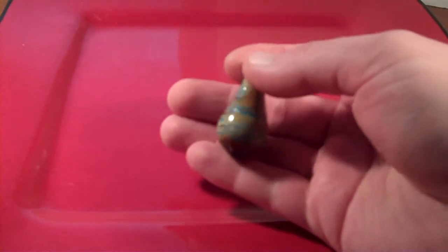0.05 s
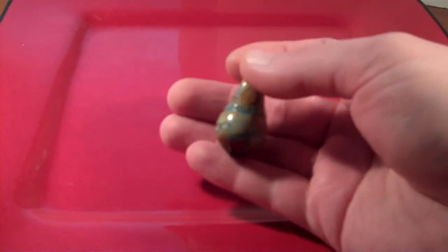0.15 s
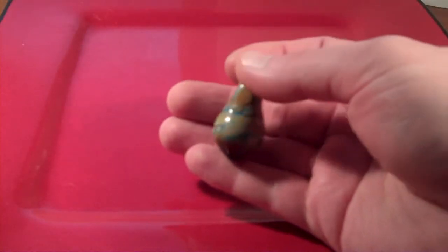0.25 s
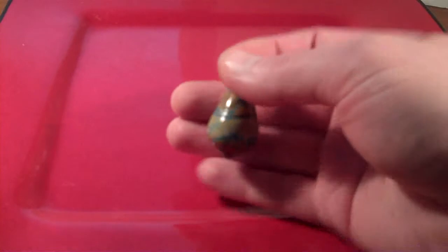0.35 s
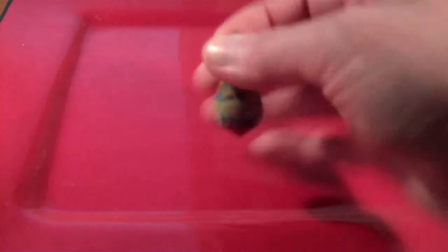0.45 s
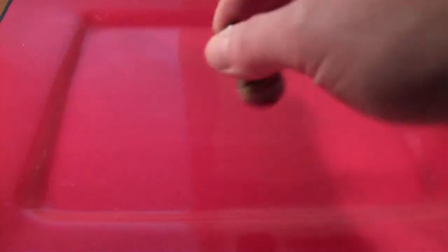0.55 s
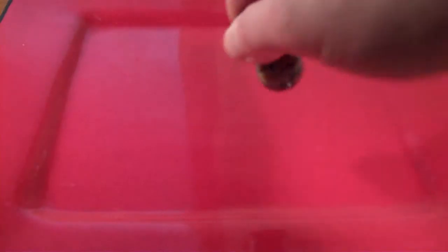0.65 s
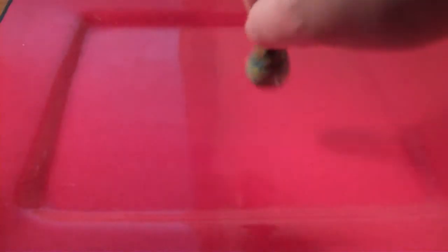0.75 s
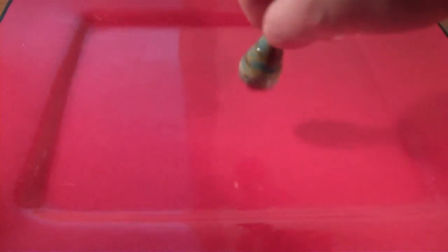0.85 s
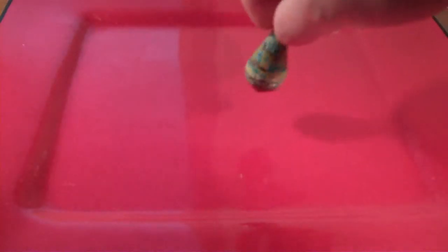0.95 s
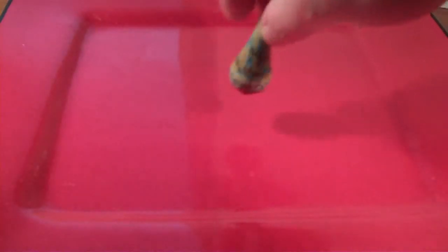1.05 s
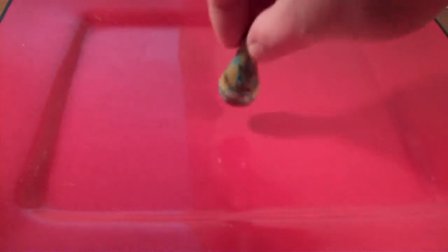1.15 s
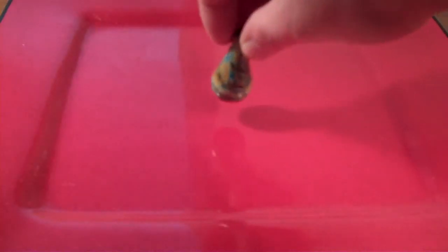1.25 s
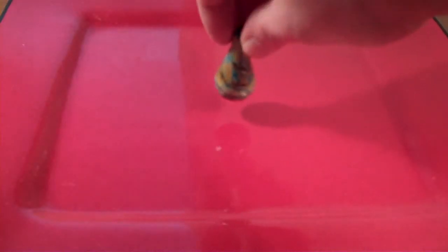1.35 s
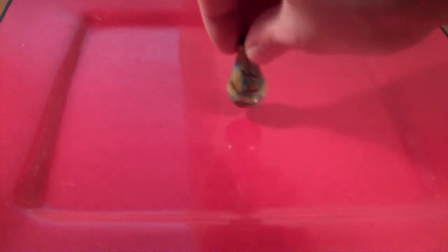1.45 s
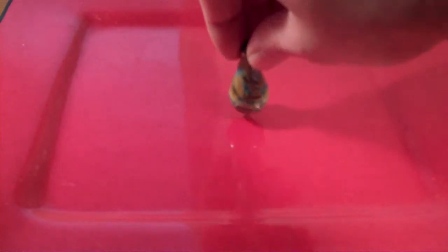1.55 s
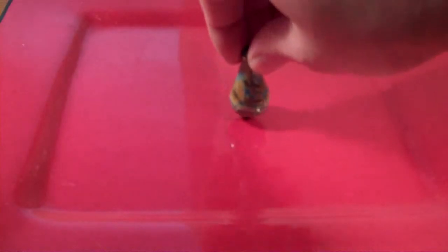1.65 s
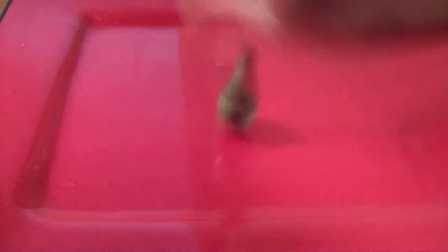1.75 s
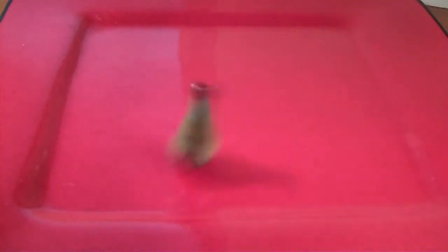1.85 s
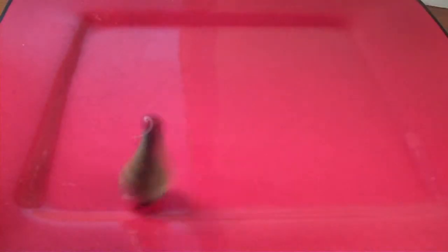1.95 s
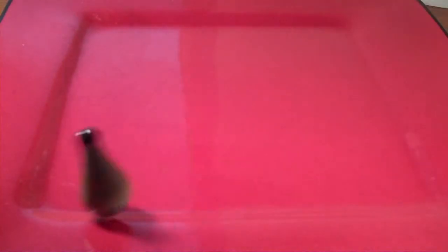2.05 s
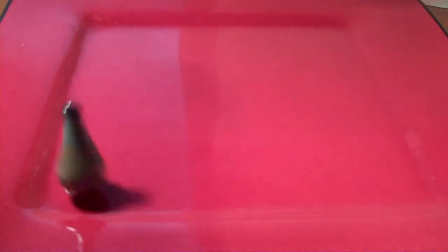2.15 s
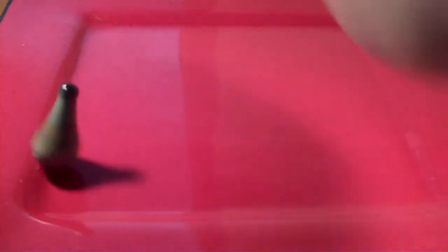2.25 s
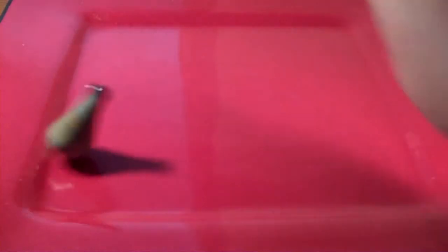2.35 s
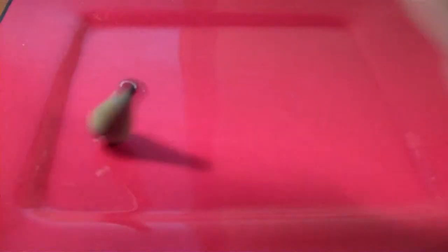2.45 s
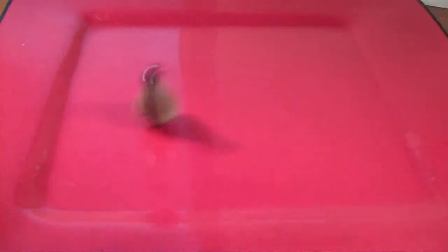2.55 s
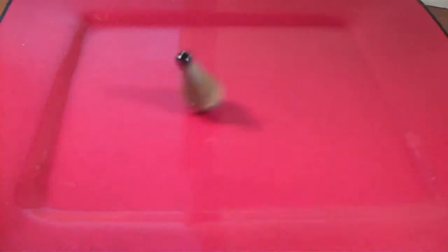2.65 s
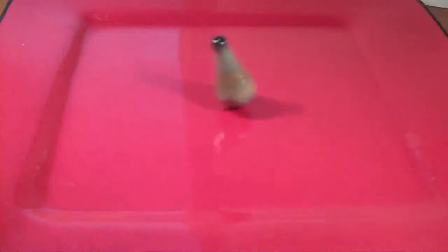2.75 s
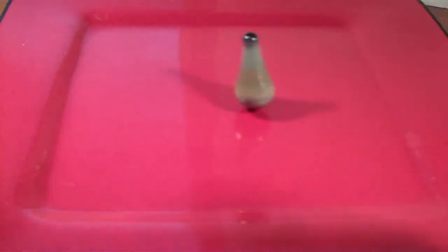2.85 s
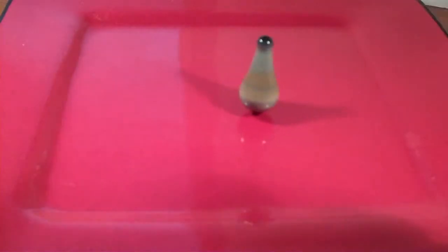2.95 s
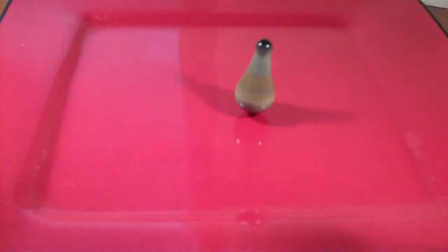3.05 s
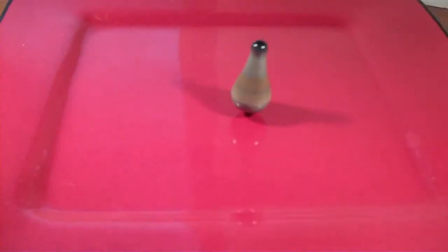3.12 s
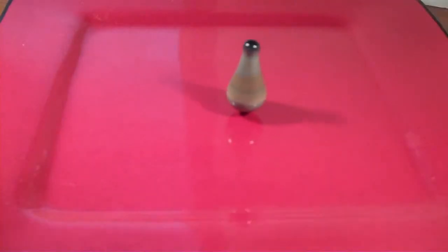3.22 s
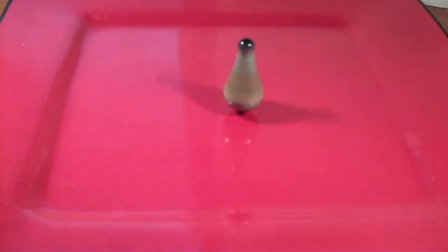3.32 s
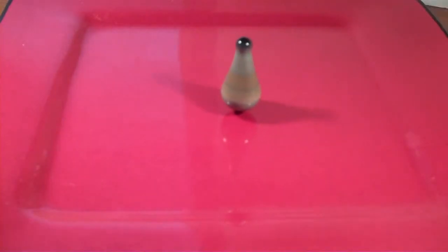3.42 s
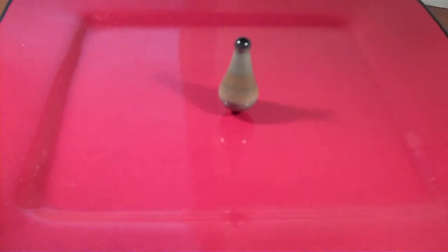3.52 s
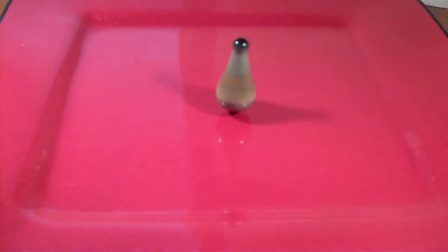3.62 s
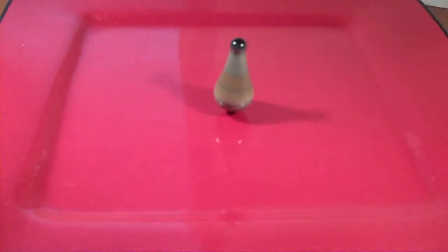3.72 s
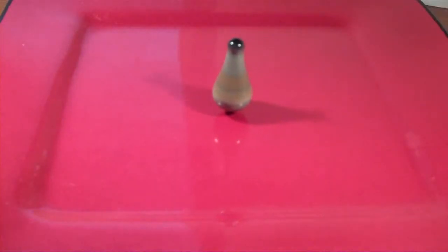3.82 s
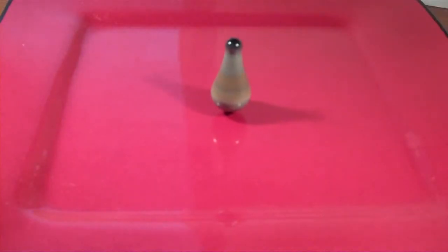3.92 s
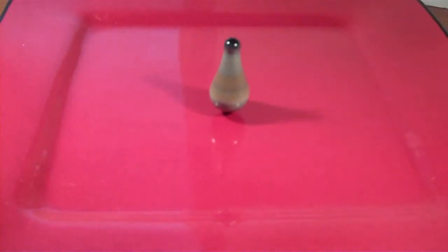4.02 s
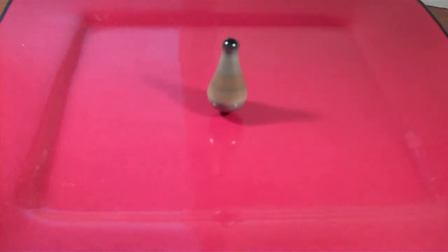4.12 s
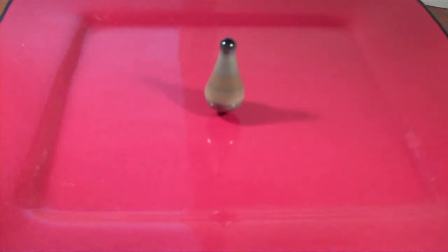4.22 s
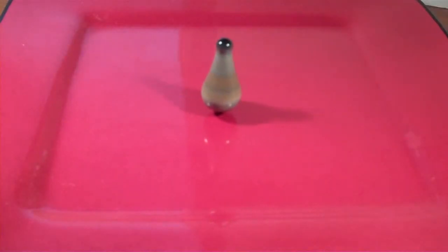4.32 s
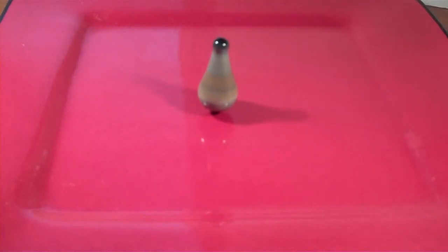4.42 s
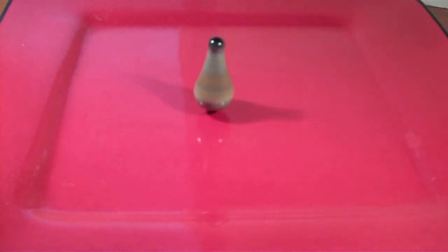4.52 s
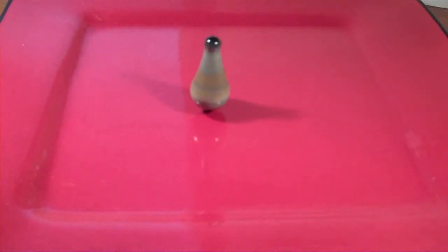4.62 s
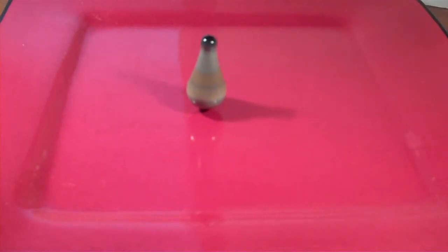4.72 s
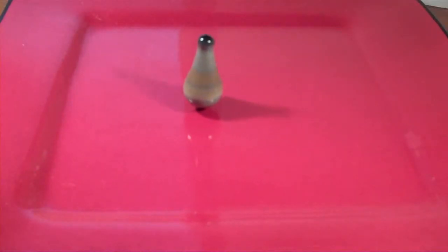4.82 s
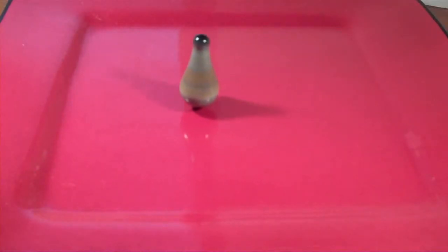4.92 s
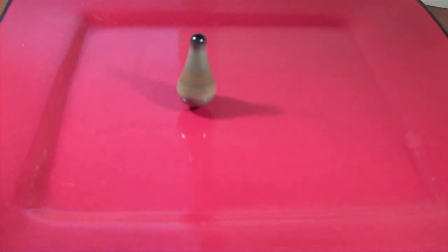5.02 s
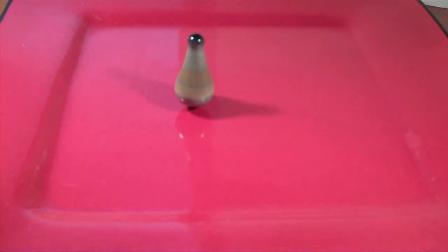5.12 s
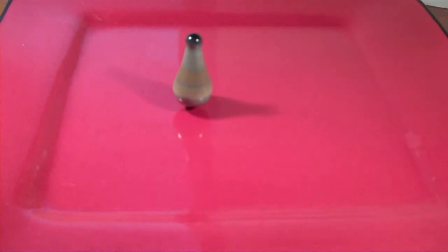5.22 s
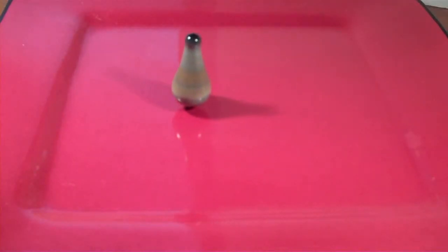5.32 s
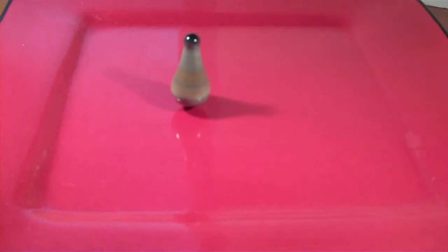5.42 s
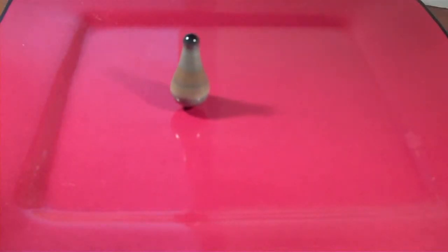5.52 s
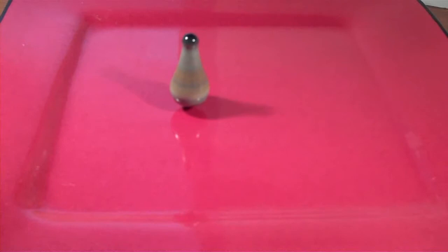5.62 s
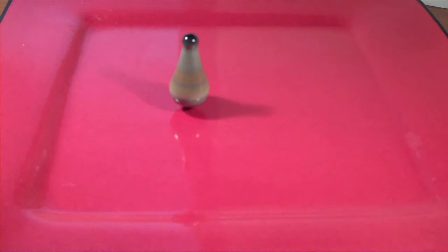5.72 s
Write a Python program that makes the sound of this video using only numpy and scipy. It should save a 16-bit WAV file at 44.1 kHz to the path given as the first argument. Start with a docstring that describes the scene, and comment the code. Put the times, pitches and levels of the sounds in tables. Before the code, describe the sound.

A small glass top drops spinning onto a ceramic plate, clinks loudly, rattles around the rim, then settles into a faint grainy whir.

```python
"""In a quiet room, a glass top is dropped spinning onto a ceramic plate, heard up close in stereo.
It bounces with cracks and ringing modes, then rattles along the rim with every wobble, a touch a turn.
It stands up and whirs on its tip: grainy noise pushes the plate's resonances, with rasps where it catches.
The clinks overload the input, whose gain ducks and creeps back while the top spins on.
Short dull reflections and a steady low room rush lie behind it."""
import sys
import numpy as np
from scipy import signal
from scipy.fft import rfft, irfft, next_fast_len
from scipy.io import wavfile
from scipy.ndimage import uniform_filter1d, minimum_filter1d, map_coordinates

SR = 44100
rng = np.random.default_rng(int(sys.argv[2]) if len(sys.argv) > 2 else 0)


def to_wav(s):
    """Save 16-bit WAV."""
    ch = np.atleast_2d(s).T  # columns
    pcm = np.round(np.clip(ch, -1, 1) * 32767)  # PCM
    wavfile.write(sys.argv[1], SR, pcm.astype(np.int16))


N = 254456

# Ringing modes of the plate: (nominal frequency [Hz], relative level [dB], left minus right [dB])
PLATE_MODES = [(332, -34, 0), (890, -26, -1), (1580, -7, 2), (1930, -23, -2), (2356, -2, 1),
               (2625, -11, -2), (2890, -13, 2), (3430, -6, -6), (3540, -5, 3), (3780, -8, 1), (4120, -5, 3),
               (4248, -9, -3), (4685, -7, -2), (4805, 0, -6), (5115, -4, -2), (5155, -5, -2),
               (5447, -9, -1), (5960, -2, -14), (6288, -8, -3), (6680, -10, -7), (6830, -12, 3),
               (7450, -9, 13), (7555, -2, 19), (7915, -7, 15), (8110, -11, 13), (8490, -19, 16)]
# Broad grit of the tip on the glaze: (frequency [Hz], relative density [dB per Hz])
GRIT_SPECTRUM = [(500, -22), (1200, -0.5), (2600, 8.5), (3500, -1.5), (4100, -5), (5200, -11.5),
                 (6000, -15.5), (8000, -9), (10000, -50.5)]
TURNS_PER_S = 63  # the spin


def amp(db):
    """Decibels to gain."""
    return 10 ** (np.asarray(db) / 20)


def unit(x):
    """Scaled to rms 1."""
    return x / np.sqrt(np.mean(x ** 2) + 1e-20)


def along(points, hz):
    """(frequency [Hz], value) points read on a log frequency axis."""
    f, v = np.transpose(points)
    return np.interp(np.log(hz + 1), np.log(f + 1), v)


def curves(rows):
    """One value per sample for each column after the time."""
    s, *cols = np.transpose(rows)
    return [np.interp(np.arange(N) / SR, s, c) for c in cols]


def drift(rate):
    """A smooth random curve with rate knots a second."""
    knots = rng.standard_normal(int(N * rate / SR) + 4)
    return map_coordinates(knots, [np.arange(N) * rate / SR])


def filtered(x, response):
    """x times a complex response of frequency."""
    n = x.shape[-1]
    m = next_fast_len(n + SR // 8)
    return irfft(rfft(x, m) * response(np.fft.rfftfreq(m, 1 / SR)), m)[..., :n]


def pair(alike, size):
    """White stereo noise whose two sides share the given likeness (correlation)."""
    mid, side = rng.standard_normal((2, size))
    turn = np.arccos(np.clip(alike, -1, 1)) / 2
    return np.cos(turn) * mid + np.sin(turn) * np.array([side, -side])


def coloured(x, spectrum):
    """x under a spectrum, at rms 1."""
    return unit(filtered(x, lambda hz: amp(along(spectrum, hz))))


def add(track, s, sound):
    """Mix a sound into a track at s seconds."""
    part = track[..., round(s * SR):][..., :sound.shape[-1]]
    part += sound[..., :part.shape[-1]]


def clinks(clash_db=-7, clash_t60=0.077, crack_db=-1, crack_t60=0.0065):
    """Each blow cracks and rings the plate, with its own share of low, middle and high ring."""
    # Dense short ringing between the modes: (frequency [Hz], relative density [dB per Hz])
    clash_spectrum = [(200, -15.5), (600, -19), (1000, -5), (1700, 3), (3500, 8), (6800, -13.5), (8100, -8),
                      (13500, -12)]
    low_ring_db, rim_low_ring_db = -7, -12  # at the middle, and the change at the stiff rim
    out = np.zeros((2, N))
    t = np.arange(SR // 2) / SR
    early = slice(SR // 70)  # each share is levelled on its first 14 ms
    mode_hz = np.array(PLATE_MODES)[:, 0]
    lag = rng.normal(0, 1.0, (len(PLATE_MODES), 1, 1))  # each mode reaches the two ports out of step

    def register(hz):
        return np.digitize(hz, [1000, 2000, 5600])

    for s, level, treble, strongest_hz in contacts():
        low = low_ring_db + rim_low_ring_db * outward(s)
        modes = ring(t, strongest_hz, lag)
        clash = amp(clash_db) * coloured(pair(0.83, len(t)), clash_spectrum)
        # register 1 is the low ring, 0 and 2 stay at the blow's level, 3 is the treble
        for bands, db in ([1], low), ([0, 2], 0), ([3], treble):
            part = filtered(clash, lambda hz: np.isin(register(hz), bands))
            part = part * amp(-60 * t / clash_t60)
            part += modes[np.isin(register(mode_hz), bands)].sum(0)
            add(out, s, amp(level + db) * part / part[:, early].std())
        crack = coloured(pair(0.63, len(t)), clash_spectrum)
        add(out, s, amp(level + crack_db - 60 * t / crack_t60) * crack)
    return out


def ring(t, strongest_hz, lag, t60=0.089, slow_hz=600, favour_db=7, favour_hz=110, scatter_db=3.5,
         attack=0.00027):
    """Every mode after one blow, as (mode, channel, time); the spot that is hit favours one of them."""
    hz, db, pan_db = np.transpose(PLATE_MODES)[:, :, None, None]
    chance = rng.standard_normal((len(PLATE_MODES), 3, 1, 1))
    favour = favour_db * np.exp(-((hz - strongest_hz) / favour_hz) ** 2)
    db = db + scatter_db * chance[:, 0] + favour
    apart = np.array([[.5], [-.5]])  # left, right
    sides = amp(pan_db * apart) / np.hypot(amp(pan_db / 2), amp(-pan_db / 2))
    cycles = (hz + 8 * chance[:, 1]) * t + chance[:, 2]  # each blow detunes the modes by some 8 Hz
    phase = 2 * np.pi * cycles + lag * apart
    life = t60 * (1 + (slow_hz / hz) ** 2)  # the slow bending modes hum on longest
    return amp(db - 60 * t / life) * sides * np.sin(phase) * (1 - np.exp(-t / attack))


def contacts(count=4):
    """Two blows a bounce, one a turn in each rattle: (time [s], level [dB], treble [dB], ring [Hz])."""
    # The top lands on its tip, then its flank slaps down:
    # (time [s], level [dB], slap over that [dB], treble [dB], strongest ring [Hz])
    bounces = [(1.8516, 1.5, -10, -11, 3430), (1.9369, 11.5, -9.5, -2.5, 6290), (1.9936, 6, -4.5, -5, 4810),
               (2.042, -2, 2.5, -7.5, 5040), (2.0833, -6, 2.5, -9, 4990)]
    # Each wobble dips the spinning flank onto the plate for a short rattle:
    # (time [s], level [dB], turns until the deepest touch, treble [dB], strongest ring [Hz])
    rattles = [(2.1846, 0.5, 0.39, -3, 4810), (2.2457, -2, 0.057, -5, 4810), (2.3123, -3.5, 0.83, -3, 4970),
               (2.3707, -3.5, 0.21, 2.5, 7550), (2.4204, -3, 0.65, -7, 3540),
               (2.4766, -6.5, 0.19, -4.5, 5960), (2.5277, -2.5, 0.18, 1.5, 7560),
               (2.575, -0.5, 0.45, 2, 7550), (2.625, -2.5, 1.33, 1, 7900), (2.684, -4, 0.91, -0.5, 4120),
               (2.7481, -1, 0.76, -2, 3920), (2.81, -2, 0.36, -4, 4800), (2.856, -9.5, 0.76, -9, 5150),
               (2.907, -5, 0.8, -8.5, 5070)]
    # A graze strikes a new spot, which favours a ring in this range: (lowest [Hz], highest [Hz])
    graze_ring = (3670, 5400)
    slap_s = 0.011  # from tip to flank
    graze_db, graze_dull_db, graze_limit_db = 5, 3, 15  # weaker and duller off the deepest; most lost
    scatter_s = 0.0008  # how unevenly the touches come
    for s, db, slap_db, treble_db, hz in bounces:
        yield s, db, treble_db, hz
        yield s + slap_s, db + slap_db, treble_db, hz
    turns = np.arange(count)
    for s, db, deepest, treble_db, hz in rattles:
        off = np.abs(turns - deepest)
        loss = graze_db * (off ** 2 - off.min() ** 2)
        weaker = graze_limit_db * np.tanh(loss / graze_limit_db)
        duller = graze_dull_db * (off - off.min())
        uneven = scatter_s * np.sqrt(turns) * rng.standard_normal(count)
        times = s + turns / TURNS_PER_S + uneven
        rings = np.where(off == off.min(), hz, rng.uniform(*graze_ring, count))
        yield from zip(times, db - weaker, treble_db - duller, rings)


def outward(s):
    """How far out the top is at s seconds: 0 at the middle, 1 at the rim."""
    # The top's path: (time [s], share of the way from the middle of the plate to its rim)
    path = [(1.95, 0), (2.19, 0.94), (2.85, 0.89), (3.15, 0.015)]
    return np.interp(s, *np.transpose(path))


def whir(roll_db=-45, scratch_db=1.5, turn_db=3, uneven_db=2.24, grain_db=3.0, grit_db=-6):
    """The tip rubs the glaze, harder once a turn, and its grainy push sounds through the plate."""
    # The tip on smoother and rougher glaze: (time [s], relative scratching level [dB])
    glaze = [(4.03, -43.5), (4.12, -38), (4.538, -41), (4.954, -47), (5.074, -38.5), (5.09, -46),
             (5.694, -47), (5.77, -53)]
    # Rumble of the rolling tip: (frequency [Hz], relative density [dB per Hz])
    roll_spectrum = [(500, -32), (800, -9), (1100, 15.5), (1350, 11), (2000, -6.5), (2700, 5), (3600, -46),
                     (6000, -21)]
    rim_scratch_db, rim_roll_db = 16.5, 10.5  # the tip scrapes and rolls harder at the rim
    land_s, upright_s, settle_s = 1.94, 2.92, 0.8  # tip stays down; top stands up; its rolling swells
    t = np.arange(N) / SR
    rim = outward(t)
    upright = np.clip((t - upright_s) / settle_s, 0, 1)
    scratching = (t > land_s) * amp(curves(glaze)[0] + scratch_db + rim_scratch_db * rim)
    rolling = amp(roll_db) * (upright + amp(rim_roll_db) * rim)
    pressure_db = turn_db * np.cos(2 * np.pi * TURNS_PER_S * t) + uneven_db * drift(35)
    grains = pair(0.93, N) * amp(pressure_db + grain_db * drift(900))
    scratch = unit(filtered(grains, centre)) + amp(grit_db) * coloured(grains, GRIT_SPECTRUM)
    roll = unit(coloured(pair(0.47, N), roll_spectrum) * amp(.5 * pressure_db))
    return scratching * scratch + rolling * roll


def centre(hz, soft_hz=8400):
    """The plate's answer to a push at its middle; the rounded tip softens the treble."""
    # Resonances that the tip drives there: (frequency [Hz], width [Hz], relative level [dB])
    resonances = [(879.7, 18, 11.5), (1250, 630, -7), (1599, 46, 6.5), (1847, 7.7, 7), (2424, 65, 5),
                  (3446, 39, 5), (3590, 22, 0), (4360, 23, -5.5), (4658, 24, -1), (5116, 15, 1.5),
                  (5280, 16, -23), (7570, 11, 2.5)]
    modes = 0
    for k, (c, w, db) in enumerate(resonances):
        peak = 1j * hz * w / (c * c - hz * hz + 1j * hz * w)
        modes = modes + (-1) ** k * amp(db) * peak  # neighbours answer with opposite sign
    return modes / (1 + (hz / soft_hz) ** 12)


def skips(level_db=1, ring_db=-1):
    """Now and then the tip catches on a speck and rasps for a few milliseconds."""
    # Skips of the tip over specks in the glaze: (time [s], relative peak level [dB])
    specks = [(3.017, -12), (3.035, -18), (3.084, -13), (3.098, -13), (3.1916, -20.5), (3.2586, -21.5),
              (4.341, -19.5), (4.4224, -22.5), (4.4762, -30), (4.4912, -29), (4.5098, -20)]
    out = np.zeros((2, N))
    t = np.arange(SR // 10) / SR
    for s, db in specks:
        push = pair(.8, len(t)) * t * np.exp(-t / .0014)
        tick = coloured(push, GRIT_SPECTRUM) + amp(ring_db) * unit(filtered(push, centre))
        add(out, s, amp(db + level_db) * tick / np.abs(tick).max())
    return out


def walls(x, t60=0.69, wet_db=-20):
    """The short, dull answer of a furnished room: decaying noise that starts after 6 ms."""
    t = np.arange(SR // 2) / SR
    tail = coloured(rng.standard_normal((2, len(t))), [(3000, 5.5), (14000, -15.5)])
    tail = tail * amp(-60 * t / t60) * (t > .006)
    return amp(wet_db) * signal.fftconvolve(x, tail / np.linalg.norm(tail[0]), axes=1)[:, :N]


def room_noise(level_db=-43.5, hiss_top_hz=14300):
    """Steady low rush of the room with faint microphone hiss, wider in stereo towards the treble."""
    # Colour of the noise: (frequency [Hz], relative level [dB])
    room_spectrum = [(15, -86), (25, -27.5), (58, -29.5), (102, -4), (144, -8), (250, -0.5), (403, -11.5),
                     (599, -9), (684, -15), (1360, -19.5), (1640, -24), (2080, -21.5), (3530, -28.5),
                     (6670, -24.5), (14000, -48.5)]
    # Noise at the two microphone ports: (frequency [Hz], likeness as a correlation)
    likeness = [(60, 0.69), (240, 0.98), (940, 0.96), (3710, 0.0033), (14700, -0.36)]

    def colour(hz):
        turn = np.arccos(np.clip(along(likeness, hz), -1, 1)) / 2
        return amp(along(room_spectrum, hz)) * (hz < hiss_top_hz) * [np.cos(turn), np.sin(turn)]

    mid, side = filtered(rng.standard_normal((2, N)), colour)
    noise = unit(np.array([mid + side, mid - side]))
    return amp(level_db) * noise * amp([[-.4], [.4]])  # a little stronger on the right


def scene():
    """The top on its plate, in the room."""
    # The microphone's treble falls off: (frequency [Hz], gain [dB])
    mic_response = [(8100, -0.5), (9300, -3), (13500, -15), (15000, -24.5)]
    top = filtered(clinks() + whir() + skips(), lambda hz: amp(along(mic_response, hz)))
    return top + walls(top) + room_noise()


def overload(x, knee_db=4, left_db=1.0, limit_db=9, thump_db=-3):
    """The input lags behind the steepest swings, sooner on the left: hard, bright blows thump low."""
    # Colour of the thump: (frequency [Hz], relative level [dB])
    thump_spectrum = [(25, -3.5), (70, -3), (380, 0.5), (700, 2.5), (1400, -24)]
    steepness = np.abs(np.diff(x, prepend=0)) * amp([[left_db], [-left_db]])
    excess = np.maximum(steepness - amp(knee_db), 0)
    excess = amp(limit_db) * np.tanh(excess / amp(limit_db))

    def thump(hz):
        return amp(along(thump_spectrum, hz)) * 1j * hz / (1j * hz + 30)  # no steady offset

    return x + amp(thump_db) * filtered(excess, thump)


def gain_control(x, threshold_db=-10, depth_db=13, hold=0.33, release_db=13.0):
    """Peaks duck the gain within a millisecond; it is held, then climbs back by release_db a second."""
    over = np.clip(20 * np.log10(np.abs(x).max(0) + 1e-9) - threshold_db, 0, depth_db)
    size = 2 * int(hold * SR / 2) + 1
    # the largest excess over the hold time, seen 1 ms ahead
    held = -minimum_filter1d(-over, size, origin=size // 2 - SR // 1000)
    climb = release_db * np.arange(N) / SR
    gain_db = climb - np.maximum.accumulate(held + climb)
    return x * amp(uniform_filter1d(gain_db, size=SR // 1000))


def record(dry):
    """Overload, gain control, rounded clipping at full scale and the band limit."""
    x = gain_control(overload(dry))
    x = x / (1 + np.abs(x) ** 8) ** (1 / 8)
    top_hz = 15289
    return filtered(x, lambda hz: 1 / (1 + (hz / top_hz) ** 60))


dry = scene()
out = record(dry)
to_wav(out)
```